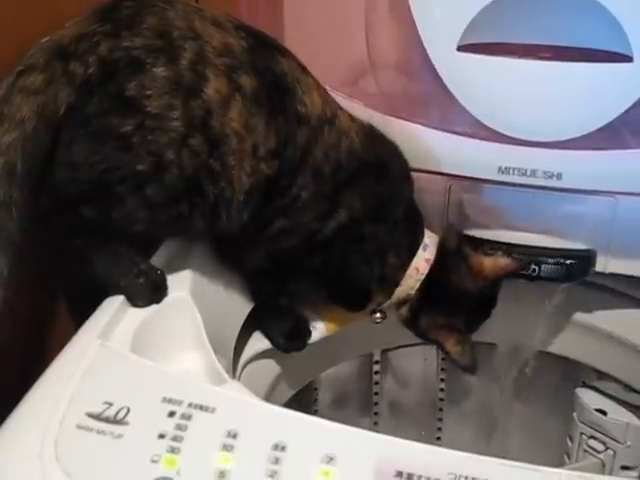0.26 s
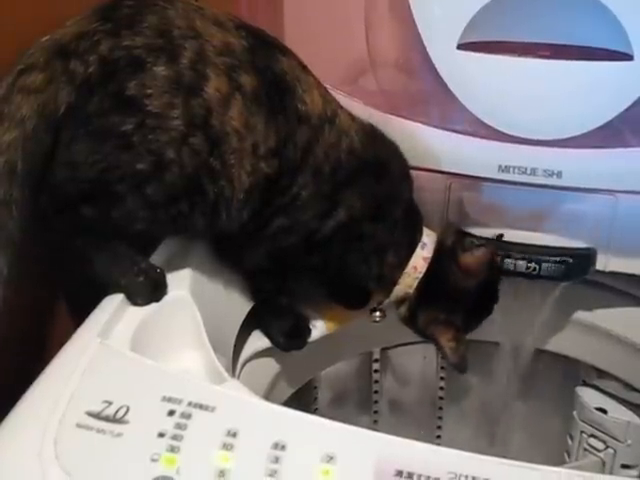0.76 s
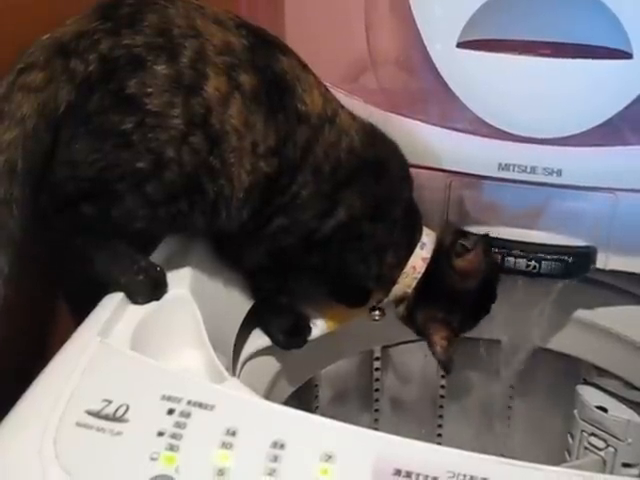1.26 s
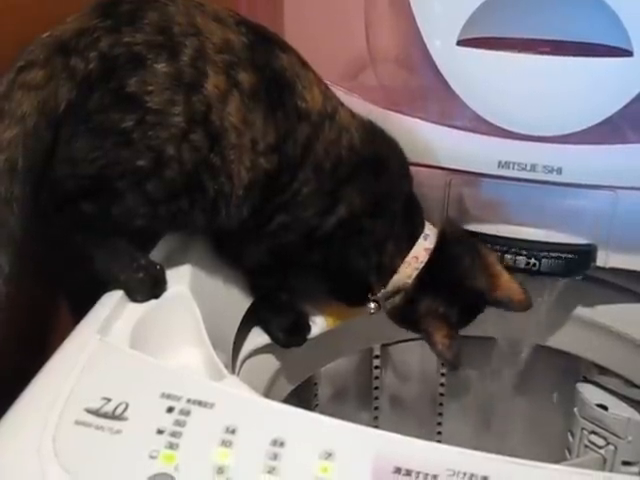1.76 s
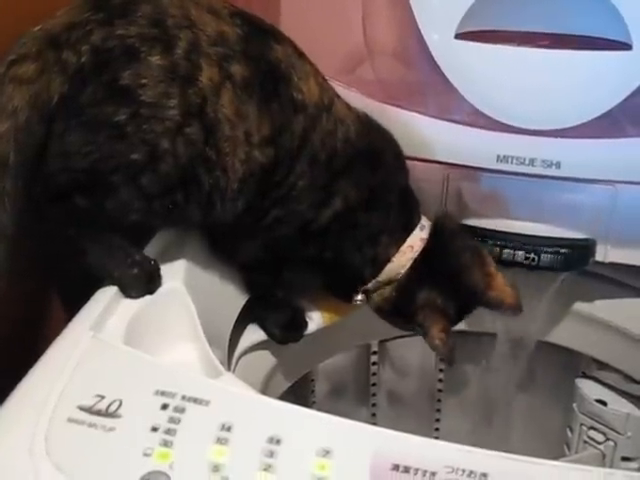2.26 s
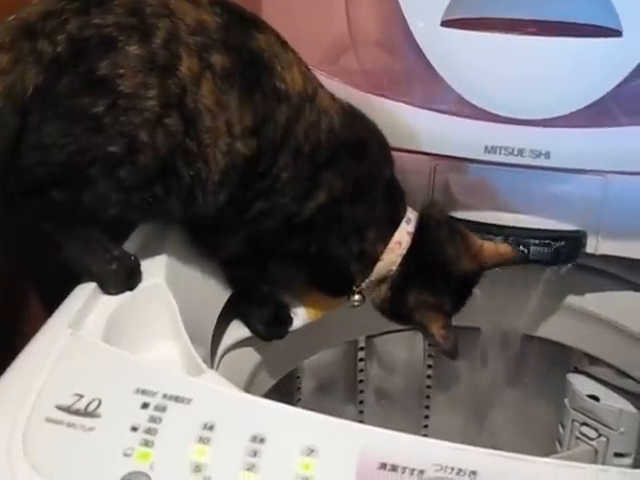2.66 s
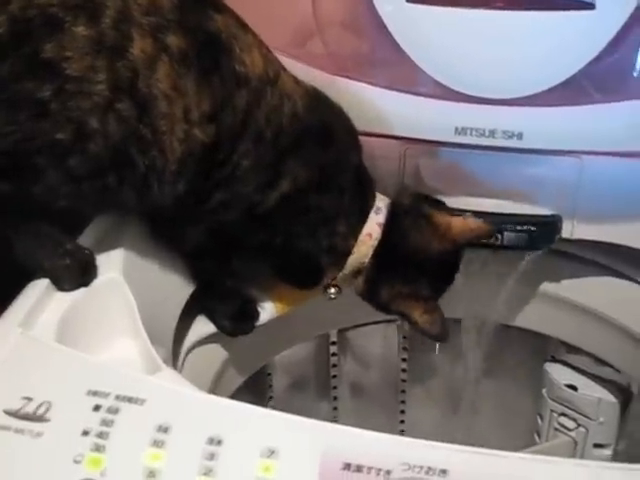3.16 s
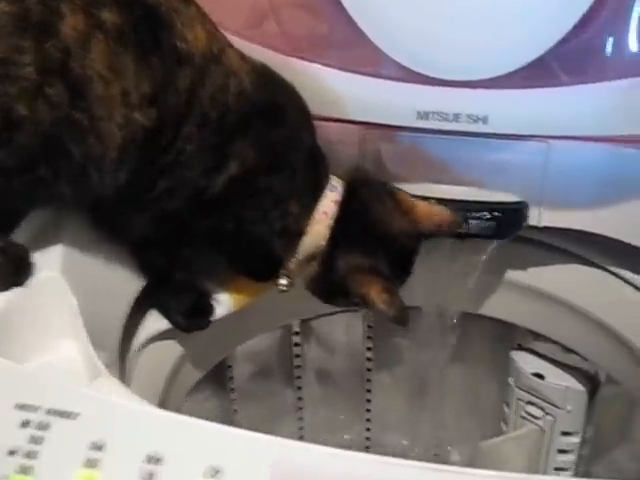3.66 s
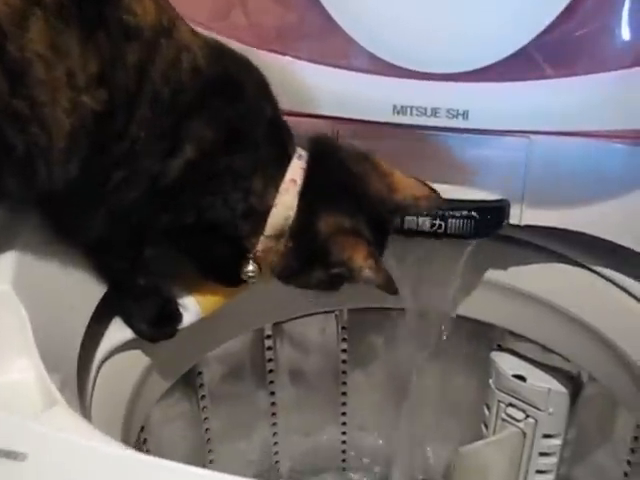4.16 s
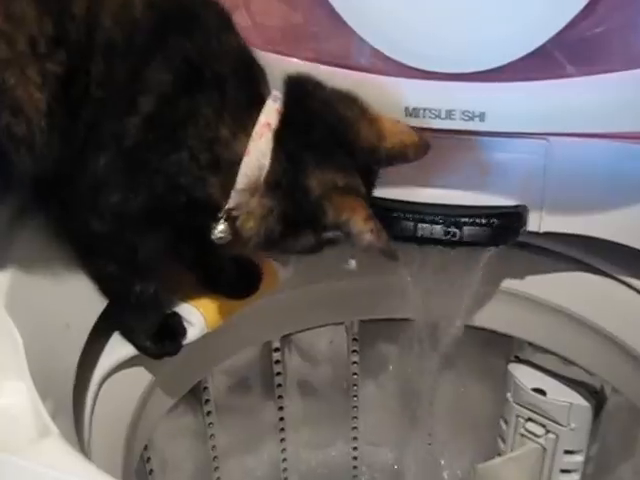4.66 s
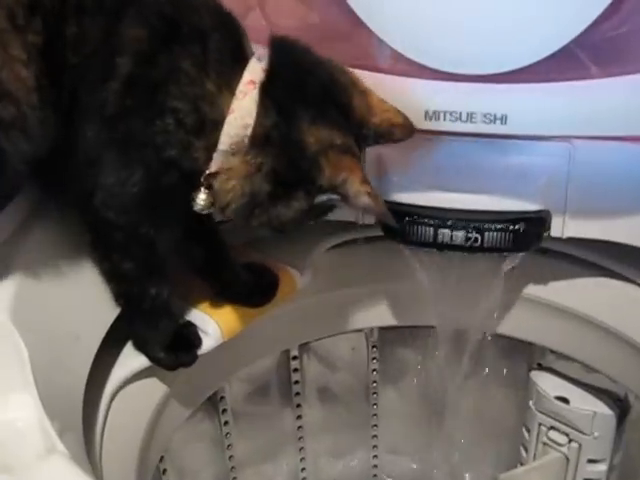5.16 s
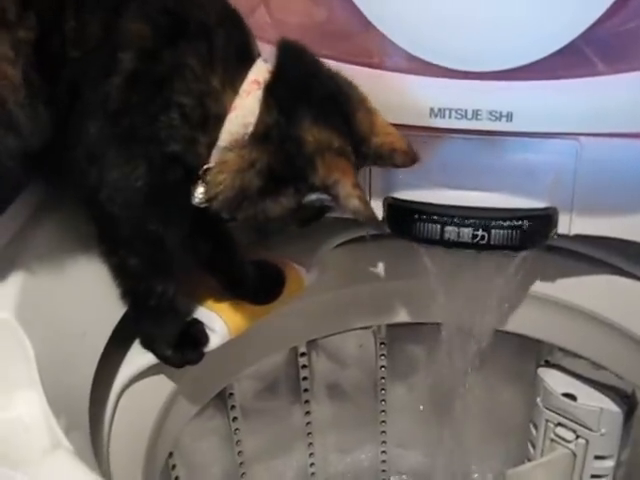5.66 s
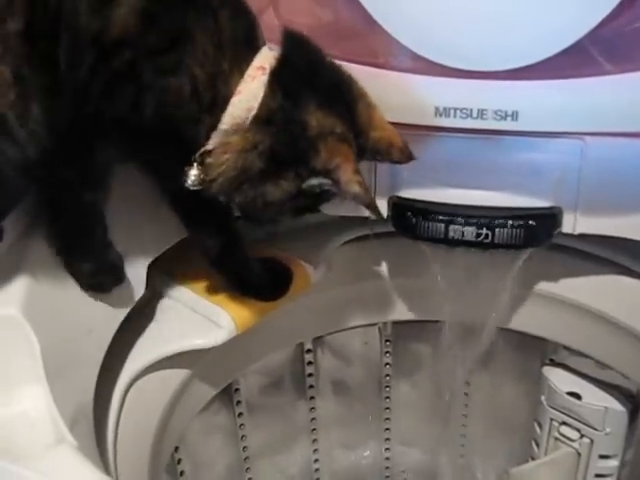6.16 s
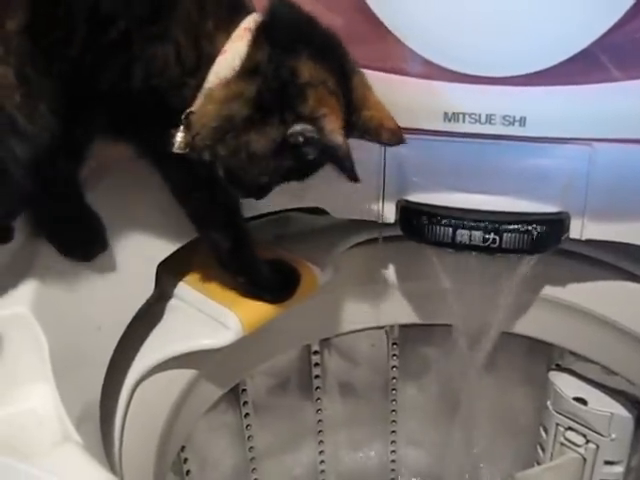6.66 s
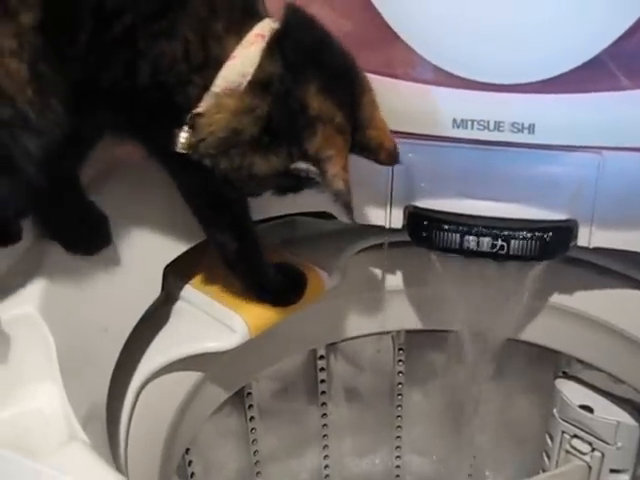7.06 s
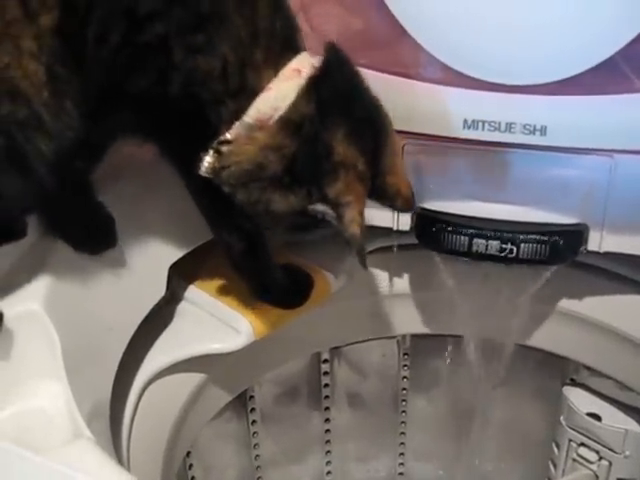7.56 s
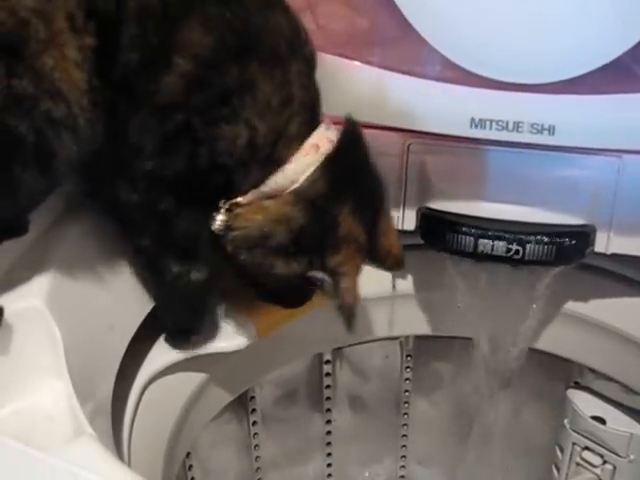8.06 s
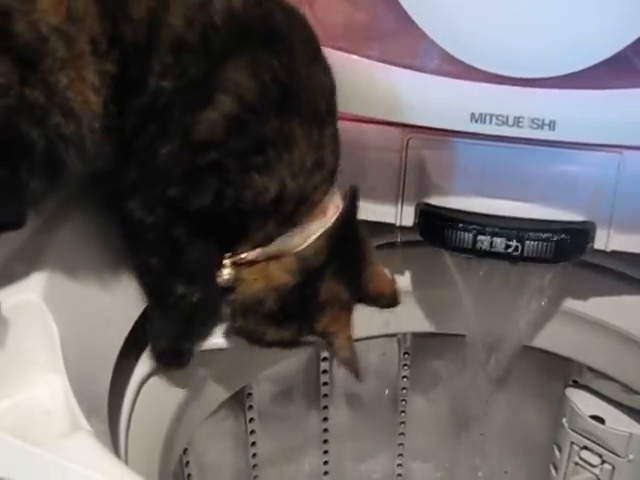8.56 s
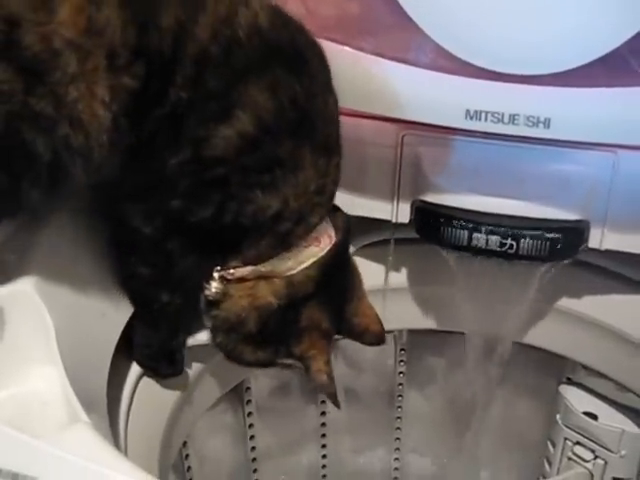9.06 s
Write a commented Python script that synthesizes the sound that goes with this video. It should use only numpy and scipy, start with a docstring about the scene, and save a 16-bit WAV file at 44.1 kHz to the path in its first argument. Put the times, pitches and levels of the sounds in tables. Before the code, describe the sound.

Water pours steadily into a hollow steel washing machine drum, spattering and pinging with bubbly plops, and one plastic knock near the middle.

```python
"""At the open lid of a top-loading washing machine, water pours into the steel drum.
The stream breaks into slugs: noise bursts and short pings spatter on the steel and fall as spray,
slap the wet bottom, trap rising bubbles and stir the air resonances of the tub.
Fat drops, bright ticks, bubble plops and heavy gulps stand out; one plastic knock brings a soft thud.
Low hum and rumble lie beneath; a small microphone with a limiter and a narrow band takes it all in."""
import sys
import numpy as np
from scipy import signal
from scipy.fft import rfft, irfft, next_fast_len
from scipy.io import wavfile
from scipy.ndimage import uniform_filter1d, minimum_filter1d, map_coordinates

SR = 44100
rng = np.random.default_rng(int(sys.argv[2]) if len(sys.argv) > 2 else 0)


def generate_wav(sig):
    """Save sig (samples, or channels by samples) to the path in sys.argv[1] as 16-bit PCM at SR."""
    pcm = np.round(np.clip(np.atleast_2d(sig).T, -1, 1) * 32767).astype(np.int16)
    wavfile.write(sys.argv[1], SR, pcm)


N = 410130

# Spatter on the steel wall. Each row: frequency in Hz, relative level in dB.
STEEL_COLOUR = [(900, -37), (1850, -20.5), (2150, -8), (2470, 2), (2720, -4), (3030, 0), (3350, -8),
                (3700, -20.5), (5000, -28.5), (7000, -73.5)]
# Mist of fine drops. Each row: frequency in Hz, relative level in dB.
SPRAY_COLOUR = [(1500, -35.5), (3000, -5), (3650, 1.5), (4300, -4), (5100, -6), (5500, -12), (6000, -14),
                (6500, -25), (6900, -40.5), (7400, -66.5)]
# Hollow ring of the drum around the landing spot. Each row: frequency in Hz, width in Hz, relative level in dB.
DRUM_MODES = [(643, 27, -6.5), (766.7, 35, -1.5), (853.5, 55, -1), (941, 49, -0.5), (1085, 130, -3.5),
              (1183, 64, -1), (1377, 157, 0.5), (1486, 113, 2.5), (1730, 80, -3), (1993, 37, 3.5)]
# The microphone leans in over the drum. Each row: time in seconds, closeness from 0 far to 1 close.
LEAN_IN = [(3.2, 0.23), (4.3, 0.92)]


def amp(db):
    """Decibels to gain."""
    return 10 ** (np.asarray(db) / 20)


def unit(x):
    """Scaled to rms 1."""
    return x / np.sqrt(np.mean(x ** 2) + 1e-20)


def along(points, hz):
    """(Hz, value) points joined on a log frequency axis."""
    f, v = np.transpose(points)
    return np.interp(np.log(hz + 1), np.log(f + 1), v)


def curve(points):
    """(s, value) points joined by straight lines, one value per sample."""
    return np.interp(np.arange(N) / SR, *np.transpose(points))


def wobble(rate):
    """A smooth random curve, rate knots a second."""
    return map_coordinates(rng.standard_normal(int(N * rate / SR) + 4), [np.arange(N) * rate / SR])


def swell(at_s, half_s):
    """A rounded rise and fall, 1 at its peak."""
    return np.exp(-np.minimum(((np.arange(N) / SR - at_s) / half_s) ** 2, 20))


def filtered(x, response):
    """x with its spectrum multiplied by a complex response of frequency."""
    size = 2 * next_fast_len(N // 2 + SR // 2)
    return irfft(rfft(x, size) * response(np.fft.rfftfreq(size, 1 / SR)), size)[:N]


def coloured(x, spectrum):
    """x through a causal (minimum-phase) filter with the given (Hz, dB) outline."""
    def response(hz):
        # folding the cepstrum forward in time makes the filter causal
        cepstrum = irfft(np.log(amp(along(spectrum, hz))))
        cepstrum[1:len(hz) - 1] *= 2
        cepstrum[len(hz):] = 0
        return np.exp(rfft(cepstrum))
    return filtered(x, response)


def band(f, centre_hz, width_hz):
    """Response of one resonance, 1 at its centre."""
    return 1j * f * width_hz / (centre_hz ** 2 - f * f + 1j * f * width_hz)


def resonate(x, modes):
    """x through parallel (Hz, width, dB) resonances of alternating sign."""
    def response(f):
        return sum((-1) ** k * amp(db) * band(f, hz, width) for k, (hz, width, db) in enumerate(modes))
    return filtered(x, response)


def place(times, sounds):
    """Sum of short sounds (one a row), each starting at its time."""
    at = np.round(times * SR).astype(int)[:, None] + np.arange(sounds.shape[1])
    return np.bincount(at.ravel(), sounds.ravel(), N)[:N]


def ping(hz, rise_s):
    """Rounded rings of a few cycles, one a row."""
    t = np.arange(SR // 150) / SR
    envelope = (t / rise_s * np.exp(1 - t / rise_s)) ** 2
    return np.sin(2 * np.pi * hz * t) * envelope


def struck(modes, contact_s):
    """What one short push rings out of a set of resonances, with peak 1."""
    t = np.arange(SR // 8) / SR
    ring = resonate(t * np.exp(-t / contact_s), modes)[:len(t)]
    return ring / np.abs(ring).max()


def in_drum(x, wet_db, count=4):
    """Direct sound plus the drum's short echo, which shifts as the stream wanders."""
    # Echo inside the drum. Each row: frequency in Hz, time in seconds to decay by 60 dB.
    decay = [(200, 0.083), (1000, 0.15), (3000, 0.14), (7000, 0.033)]
    hz, t, z = signal.stft(rng.standard_normal((count, SR // 6)), SR, nperseg=256)
    tails = signal.istft(z * amp(-60 * t / along(decay, hz)[:, None]), SR, nperseg=256)[1]
    tails = tails / np.linalg.norm(tails, axis=1, keepdims=True)
    tails = np.pad(tails, ((0, 0), (SR // 600, 0)))  # a short gap before the echo
    knots = rng.standard_normal((count, 14))
    paths = np.array([np.interp(np.arange(N), np.linspace(0, N, len(k)), k) for k in knots])
    echoes = signal.oaconvolve(x[None], tails, axes=1)[:, :N]
    return x + amp(wet_db) * np.sum(paths * echoes, axis=0) / np.linalg.norm(paths, axis=0)


def landing():
    """Levels in dB of boom, slap, spatter and spray: one loudness, shared out by where the jet lands."""
    # Loudness of the stream as heard; the gain ducks after the knock and briefly near the end.
    # Each row: time in seconds, level in dB.
    heard = [(0, -27.5), (.25, -28.5), (.9, -30), (1.7, -28.5), (1.95, -30.5), (2.3, -30), (3.3, -27.5),
             (3.74, -31), (4.45, -29.5), (4.75, -29), (5.0, -28.5), (5.2, -28), (5.7, -28), (6.3, -30),
             (6.6, -28), (7.35, -28.5), (7.7, -32.5), (8.2, -30.5), (8.35, -31), (8.47, -31.5),
             (8.53, -37.5), (8.58, -35), (8.63, -34.5), (9.3, -31.5)]
    # The boom drifts as the microphone moves over the lid. Each row: time in seconds, level in dB.
    boom_heard = [(0, -1), (3.0, -0.4), (4.8, -2), (5.7, -0.5), (6.6, -1.3), (7.6, 0), (9.3, -0.5)]
    # A thick piece of the jet lands. Each row: time in seconds, rise in dB,
    # landing spot from 0 wet bottom to 1 steel wall.
    thick_pieces = [(.48, 4, .1), (.715, 10, 0.65), (1.61, 3.5, 0.59), (1.765, 3, 0.6), (2.055, 6.5, 0.046),
                    (2.151, 4.5, .1), (2.43, 1, 0.57), (2.465, 5.5, 0.055), (2.65, 3.5, 0.13),
                    (2.93, 3.5, 0.89), (2.99, 7, 0.35), (3.09, 5, 0.15), (3.26, 6, .15), (3.309, 8, 0.3),
                    (3.47, 5.5, 0.86), (3.619, 9.5, 0.59), (4.04, 5.5, 0.81), (4.45, 8, 0.8),
                    (4.68, 3.5, 0.3), (4.755, 3.5, 1), (4.94, 9.5, 0.39), (5.06, 0, 0.12), (5.48, 4, 0.35),
                    (5.89, 1, .8), (5.95, 6, 0.52), (6.04, 8.5, 0.46), (6.98, 4, .7), (7.38, 7.5, 0.28),
                    (8.301, 5.5, 0.94), (8.37, 3, 1), (8.46, 3.5, 0.85)]
    # The stream digs into the pool and the tub booms. Each row: time in seconds, rise in dB,
    # half length in seconds.
    digs = [(0.643, 6.5, 0.087), (1.695, 4.5, 0.055), (2.135, 4.5, 0.044), (2.864, 6, 0.029),
            (3.87, 5.5, 0.023), (4.362, 6.5, 0.03), (4.489, 10, 0.016), (5.439, 6, 0.048),
            (5.756, 6.5, 0.025), (5.914, 4.5, 0.048), (6.14, 5.5, 0.035), (6.974, 4.5, 0.015)]
    loudness = curve(heard) + 0.66 * wobble(14)  # the whole jet flutters
    lean = curve(LEAN_IN)
    rises = [(db * swell(s, half_s=0.02), spot) for s, db, spot in thick_pieces]
    on_bottom = sum(rise * np.cos(spot * np.pi / 2) for rise, spot in rises)
    on_wall = sum(rise * np.sin(spot * np.pi / 2) for rise, spot in rises)
    # a splash on the bottom also stirs the tub's boom
    in_pool = sum(db * swell(s, half_s) for s, db, half_s in digs) + 0.41 * on_bottom
    # the landing spot wanders, so each part also swells on its own
    wander_per_s = 16
    boom = -5.5 + curve(boom_heard) + in_pool + 0.5 * wobble(wander_per_s)
    slap = -7 - 0.5 * lean + on_bottom + 1.02 * wobble(wander_per_s)
    spatter = -1.0 + 0.5 * lean + 0.57 * on_wall + 1.2 * wobble(wander_per_s)
    spray = -10.5 + 0.5 * lean + on_wall + 1.23 * wobble(wander_per_s)
    return loudness + boom, loudness + slap, loudness + spatter, loudness + spray


def impacts(slugs, own_db, scatter_s, wash_db, count):
    """Each slug bursts into count droplets of its own strength, over an even wash of fine spray."""
    times, size_db = slugs
    size = amp(size_db + own_db * rng.standard_normal(len(times)).clip(-2, 2))
    delays = scatter_s * rng.exponential(size=(len(times), count))
    lands = times[:, None] + delays * rng.uniform(.2, 1.8, (len(times), 1))
    pushes = size[:, None] * rng.standard_normal(lands.shape)
    train = unit(place(lands.ravel(), pushes.reshape(-1, 1))) + amp(wash_db) * rng.standard_normal(N)
    # automatic gain: power is levelled over a fifth of a second, so the patter stays even
    return train / np.sqrt(np.abs(uniform_filter1d(train ** 2, SR // 5)) + 1e-9)


def splashes(slugs, centre_hz, spread, own_db, scatter_s, count):
    """Each slug has its own pitch and breaks into count pinging drops near it, each weaker than the last."""
    times, size_db = slugs
    pitch, strength = rng.standard_normal((2, len(times), 1)).clip(-1.6, 1.6)
    gaps = scatter_s * rng.exponential(size=(len(times), count))
    lands = times[:, None] + np.cumsum(gaps, axis=1)
    hz = centre_hz * np.exp(spread * (pitch + .5 * rng.standard_normal(lands.shape)))
    size = amp(size_db[:, None] + own_db * strength - np.arange(count))  # 1 dB down per drop
    return unit(place(lands.ravel(), size.reshape(-1, 1) * ping(hz.reshape(-1, 1), rise_s=0.00063)))


def bubbles(count, centre_hz, spread, cycles, size_db):
    """Trapped air pockets ring briefly and rise in pitch."""
    t = np.arange(SR // 30) / SR
    hz = centre_hz * np.exp(spread * rng.standard_normal((count, 1)))
    age = t * hz / cycles  # in decay times
    size = amp(size_db * np.minimum(rng.exponential(size=(count, 1)), 3))
    tone = np.sin(2 * np.pi * hz * t * (1 + 0.031 * np.minimum(age, 4)))
    rings = size * tone * np.exp(-age) * (1 - np.exp(-5 * age))
    return unit(place(rng.uniform(0, N / SR, count), rings))


def tub_air(blows):
    """The tub's boom; its modes are heard in another balance as the microphone leans in."""
    # Air in the tub. Each row: frequency in Hz, width in Hz, relative level in dB from afar,
    # relative level in dB from close by.
    air_modes = np.array([(103.2, 8.1, -9, -8), (166.5, 19, -4.5, -4), (185.2, 14, -0.5, -0.5),
                          (245.4, 10.5, -4, -3.5), (317.5, 53, -16, -16), (347.3, 20, -15, -11),
                          (398, 14, -5.5, -7.5), (431.5, 15, -5.5, -9), (491, 35, -13, -22.5),
                          (581.4, 12, -17, -16)])
    far = resonate(blows, air_modes[:, [0, 1, 2]])
    near = resonate(blows, air_modes[:, [0, 1, 3]])
    lean = curve(LEAN_IN)
    return blows.std() * unit((1 - lean) * far + lean * near)


def stream(count=900):
    """The same slugs of water drive the steel wall, the spray, the wet bottom and the air of the tub."""
    boom_db, slap_db, spatter_db, spray_db = landing()
    # the jet pinches off at a loosely even pace
    times = (np.arange(count) + rng.uniform(0, 2, count)) * N / SR / count
    slugs = times, 1.1 * rng.standard_normal(count).clip(-2, 2)
    # drops on the thin steel ping near one pitch
    spatter = impacts(slugs, own_db=3.0, scatter_s=.004, wash_db=-3.0, count=6)
    spatter = unit(coloured(spatter, STEEL_COLOUR))
    pings = splashes(slugs, centre_hz=2637, spread=0.1, own_db=2.0, scatter_s=.0013, count=2)
    wall = unit(in_drum(pings + amp(-2.0) * spatter, wet_db=-7.0))
    # what bounces off comes down as fine, bright spray
    mist = coloured(impacts(slugs, own_db=5.0, scatter_s=.007, wash_db=-4.0, count=14), SPRAY_COLOUR)
    fizz = splashes(slugs, centre_hz=4080, spread=0.13, own_db=3.5, scatter_s=.003, count=3)
    spray = unit(in_drum(unit(mist) + amp(-5.0) * fizz, wet_db=-6.5))
    # water meeting water slaps and traps bubbles
    slap = resonate(impacts(slugs, own_db=5.5, scatter_s=.003, wash_db=-6.0, count=6), DRUM_MODES)
    plips = bubbles(count=1100, centre_hz=1271.0, spread=0.264, cycles=4.75, size_db=2.0)
    bottom = unit(in_drum(unit(slap) + amp(-5.0) * plips, wet_db=-11.0))
    # the air in the tub booms under the blows
    blows = amp(boom_db) * impacts(slugs, own_db=3.5, scatter_s=.004, wash_db=-5.0, count=4)
    boom = tub_air(blows)
    return amp(spatter_db) * wall + amp(spray_db) * spray + amp(slap_db) * bottom + boom


def background():
    """Low hum and rumble of the house: wavering sines and dark noise, drifting slowly in level."""
    # Hum. Each row: frequency in Hz, level in dB rms ahead of the drift.
    hum_tones = [(26.4, -50.5), (43.0, -44)]
    # Rumble. Each row: frequency in Hz, relative level in dB.
    rumble_colour = [(15, -25), (30, -7), (50, 1), (65, 1.5), (130, 0), (300, -4), (600, -6.5),
                     (2000, -23.5), (7000, -67.5)]
    t = np.arange(N) / SR
    hum = np.zeros(N)
    for hz, db in hum_tones:
        level = amp(db + 2.2 * wobble(4.5)) * np.sqrt(2)
        hum += level * np.sin(2 * np.pi * hz * t + .3 * wobble(3.6))
    rumble = amp(-40.0) * unit(coloured(rng.standard_normal(N), rumble_colour))
    drift_db = np.interp(t, [0, 3.4, 5.6, 6.4, 9.3], [0, 1.5, 1.0, -2.5, -5.5])
    return (hum + rumble) * amp(drift_db)


def fat_drops():
    """A fat drop pings for a few cycles, a smaller one trails it, and its splash patters down."""
    # The fattest drops on the drum wall. Each row: start in seconds, relative level in dB, pitch in Hz.
    drops = [(0.158, -14, 2700), (0.1973, -11, 2900), (0.2562, -8.5, 2830), (0.5077, -12.5, 2400),
             (.719, -11.5, 2670), (0.826, -11.5, 2270), (0.9648, -10.5, 2300), (1.178, -11, 3000),
             (1.294, -15, 2440), (1.368, -13.5, 2950), (1.5025, -13.5, 2900), (1.529, -14.5, 2470),
             (1.7, -8.5, 2750), (1.7593, -12, 2270), (1.7686, -8.5, 2730), (2.0939, -11.5, 2600),
             (2.237, -10, 2290), (2.2706, -14, 2780), (2.3054, -13, 2530), (2.35, -9.5, 2760),
             (2.792, -13.5, 2480), (2.959, -11.5, 2370), (2.986, -11.5, 2500), (3.045, -13, 2440),
             (3.095, -13.5, 2580), (3.2404, -9, 3060), (3.303, -8.5, 2370), (3.331, -16, 2510),
             (3.609, -9.5, 2940), (3.7035, -10, 2770), (3.9198, -11.5, 2560), (4.045, -14, 3050),
             (4.077, -9.5, 2380), (4.163, -11, 2300), (4.3585, -11, 2740), (4.441, -16.5, 2410),
             (4.475, -10.5, 2460), (4.688, -18.5, 2850), (4.762, -9, 2550), (4.8452, -12.5, 2440),
             (4.936, -6.5, 2260), (4.9466, -14.5, 2340), (5.112, -13.5, 2630), (5.243, -11.5, 2520),
             (5.291, -10.5, 2590), (5.3176, -12, 2700), (5.3317, -11.5, 2670), (5.444, -12, 2800),
             (5.5105, -13, 2800), (5.608, -10, 2350), (5.6803, -8.5, 2600), (5.731, -7, 2770),
             (5.9, -10.5, 2520), (5.93, -11.5, 2380), (5.9661, -11.5, 2440), (6.026, -13, 2500),
             (6.068, -11, 2560), (6.14, -13.5, 2400), (6.2298, -4.5, 2590), (6.413, -10, 2560),
             (6.608, -12.5, 2560), (6.6878, -15.5, 2600), (6.74, -13, 2510), (6.811, -16, 2700),
             (6.9386, -13, 2550), (6.973, -10.5, 2520), (7.268, -7.5, 2500), (7.284, -11.5, 2630),
             (7.362, -11, 2880), (7.596, -7.5, 2600), (7.7193, -9.5, 2340), (7.779, -11, 2700),
             (7.787, -11.5, 2330), (7.873, -15.5, 2600), (7.908, -7, 2400), (7.962, -14, 2850),
             (8.019, -10, 2720), (8.185, -14.5, 2540), (8.2456, -9, 2520), (8.26, -12.5, 2480),
             (8.3788, -10, 2760), (8.48, -7, 2750), (8.7915, -15.5, 2650), (9.0647, -16, 2450)]
    s, db, hz = np.transpose(drops)[:, :, None]
    t = np.arange(SR // 25) / SR
    splash = amp(db - 5.0) * rng.standard_normal((len(s), len(t))) * np.exp(-t / .005)
    starts = s[:, 0] + .0005
    patter = place(starts, splash)
    lag, detune = rng.uniform((.5, .88), (1.5, 1.12), (len(s), 2)).T
    rings = place(starts, amp(db - 1.4) * ping(hz, rise_s=0.0008))
    trailing = amp(db - 7) * ping(hz * detune[:, None], rise_s=.0006)
    rings += place(starts + .0028 * lag, trailing)
    on_steel = coloured(patter, STEEL_COLOUR)
    mist = amp(-8) * coloured(patter, SPRAY_COLOUR)
    hollow = amp(-8.5) * resonate(patter, DRUM_MODES)
    return in_drum(rings + on_steel + mist + hollow, wet_db=-11.5)


def gulps():
    """A heavy slug plunges into the pool with a short, hollow thump, and its splash falls back."""
    # Heavy gulps into the pooled water. Each row: start in seconds, relative level in dB.
    plunges = [(0.3096, -16), (3.17, -22.5), (6.084, -20), (8.1853, -19.5)]
    # The cavity that a gulp opens. Each row: frequency in Hz, width in Hz, relative level in dB.
    cavity = [(200, 52, -2.5), (440, 74, 4), (795, 140, -4), (1380, 300, -16)]
    s, db = np.transpose(plunges)
    thump = struck(cavity, contact_s=0.00013)
    fade = np.exp(-np.arange(len(thump)) / SR / 0.008)
    splash = rng.standard_normal((len(s), len(thump))) * fade
    size = amp(db)[:, None]
    falling_back = amp(3.5) * resonate(place(s, size * splash), cavity)
    return in_drum(place(s, size * thump) + falling_back, wet_db=-8.0)


def plops():
    """A large bubble closes with a small slap and rings, its pitch climbing."""
    # Large bubbles trapped in the pool. Each row: start in seconds, relative level in dB,
    # pitch in Hz that the climb passes after one ring time.
    large_bubbles = [(0.463, -25, 1350), (.546, -19.5, 1260), (.603, -20.5, 1390), (.698, -19.5, 860),
                     (1, -23, 1300), (1.764, -17.5, 1470), (1.833, -22.5, 854), (2.052, -21, 1320),
                     (2.151, -16, 1350), (2.388, -23, 1330), (2.461, -17.5, 1290), (2.634, -17.5, 1370),
                     (2.681, -21, 1030), (2.984, -15.5, 1300), (3.084, -16, 1400), (3.086, -19, 850),
                     (3.249, -25, 856), (3.305, -15, 1800), (3.325, -18, 1810), (3.484, -25, 885),
                     (3.52, -16, 1290), (4.059, -17, 1370), (4.452, -18, 1450), (4.756, -18, 1420),
                     (4.947, -23, 1350), (5.05, -17.5, 1380), (5.065, -21, 870), (5.241, -18, 1360),
                     (5.453, -19.5, 840), (5.486, -21, 1720), (5.598, -20, 930), (5.659, -20, 925),
                     (5.747, -22, 1440), (5.806, -20, 930), (6.031, -23, 1160), (6.23, -16.5, 956),
                     (6.345, -21.5, 796), (6.384, -19.5, 1730), (6.458, -21, 1450), (6.688, -20.5, 1460),
                     (7.325, -16.5, 1434), (7.385, -20.5, 929), (7.387, -19, 1720), (8.149, -20.5, 915),
                     (8.26, -18.5, 1700), (8.335, -21.5, 1470), (8.407, -27, 1400), (8.478, -22, 923)]
    ring_s, attack_s, climb_per_s = 0.0034, 0.00067, 16  # the climb is relative to the pitch
    s, db, hz = np.transpose(large_bubbles)[:, :, None]
    t = np.arange(SR // 25) / SR
    tone = np.sin(2 * np.pi * hz * t * (1 + climb_per_s * (t / 2 - ring_s)))
    ring = tone * np.exp(-t / ring_s) * (1 - np.exp(-t / attack_s))
    slap = rng.standard_normal((len(s), len(t))) * np.exp(-t / 0.0046)
    rings = place(s[:, 0], amp(db + 0.8) * ring)
    slaps = resonate(place(s[:, 0], amp(db + 2.0) * slap), DRUM_MODES)
    return in_drum(rings + slaps, wet_db=-8.5)


def ticks():
    """A small droplet gives a very short, bright ping and a puff of mist."""
    # Small, fast droplets on the steel. Each row: start in seconds, relative level in dB, pitch in Hz.
    droplets = [(0.7622, -23, 4200), (1.618, -17.5, 4360), (2.4314, -14, 3630), (3.016, -25.5, 4080),
                (3.2196, -22, 4320), (3.351, -24, 4400), (3.461, -16.5, 3650), (4.0816, -18, 3600),
                (4.4534, -20, 4630), (4.9352, -22, 4350), (5.5154, -23, 3910), (6.0257, -21.5, 3860),
                (6.563, -25, 4540), (7.3638, -20, 3700), (7.786, -24, 5230), (8.021, -18, 4240),
                (8.98, -20, 3630)]
    s, db, hz = np.transpose(droplets)[:, :, None]
    t = np.arange(SR // 50) / SR
    puff = amp(db + 3.5) * rng.standard_normal((len(s), len(t))) * np.exp(-t / 0.0022)
    mist = coloured(place(s[:, 0], puff), SPRAY_COLOUR)
    pings = place(s[:, 0], amp(db - 1.5) * ping(hz, rise_s=.0004))
    return in_drum(pings + mist, wet_db=-8.5)


def knock():
    """A sharp plastic knock pushes the rim in and rings it and the drum; a soft cabinet thud follows."""
    # The plastic rim. Each row: frequency in Hz, width in Hz, relative level in dB.
    rim_modes = [(815, 140, 9), (1200, 300, 2), (1610, 70, 14.5), (2030, 120, -2), (2960, 400, -4)]
    knock_s, thud_s = 3.6948, 3.7095
    push = -amp(-11) * struck([(300, 550, 0)], contact_s=0.00026)
    rim = amp(-6.5) * struck(rim_modes, contact_s=.00008)
    drum = amp(-24) * struck(DRUM_MODES, contact_s=0.00013)
    thud = amp(-16) * struck([(183, 100, -3)], contact_s=0.00055)
    return in_drum(place(np.array([knock_s, thud_s]), np.array([push + rim + drum, thud])), wet_db=-12)


def at_microphone(x):
    """The drum's standing waves lift or cancel narrow bands; the pattern shifts as the microphone leans in."""
    # Standing waves from afar. Each row: frequency in Hz, width in Hz, lift in dB.
    waves_far = [(535, 35, -4.5), (870, 33, 7), (943, 39, -6.5), (947, 43, -7), (1125, 31, -5),
                 (1290, 60, 2), (1587, 110, -12), (1770, 35, 1.5), (1946, 35, -7), (2200, 30, 6.5),
                 (2290, 26, -3), (2536, 62, -5.5), (2720, 39, -3), (4190, 120, 6.5)]
    # The same from close by. Each row: frequency in Hz, width in Hz, lift in dB.
    waves_close = [(758, 45, 3.5), (882, 28, -10.5), (915, 35, 4), (1010, 31, -3.5), (1060, 25, 2.5),
                   (1090, 30, -4.5), (1230, 36, 0), (1736, 40, 5), (1814, 29, -4.5), (1924, 65, -10),
                   (2076, 130, -4), (2340, 36, -3), (2465, 110, 3), (2960, 38, -1), (3310, 70, -3),
                   (3570, 90, -4.5), (4350, 41, 3.5), (4530, 53, 2.5)]

    def pattern(waves):
        def response(f):
            return np.prod([1 + (amp(db) - 1) * band(f, hz, width) for hz, width, db in waves], axis=0)
        return filtered(x, response)
    lean = curve(LEAN_IN)
    return (1 - lean) * pattern(waves_far) + lean * pattern(waves_close)


def scene():
    """Everything at the open lid."""
    water = at_microphone(stream() + fat_drops() + gulps() + plops() + ticks())
    return (water + background() + knock())[None]


def record(dry):
    """A limiter ducks the tallest peaks; a steep low-pass then removes what lies above the band limit."""
    top_hz = 7050
    needed = np.minimum(1, .46 / (np.abs(dry[0]) + 1e-9))
    gain = uniform_filter1d(minimum_filter1d(needed, SR // 100), SR // 200)

    def low_pass(hz):
        return 1 / (1 + (hz / top_hz) ** 80) * (hz < top_hz + 300)
    return filtered(dry[0] * gain, low_pass)[None]


dry = scene()
out = record(dry)
generate_wav(out)
```